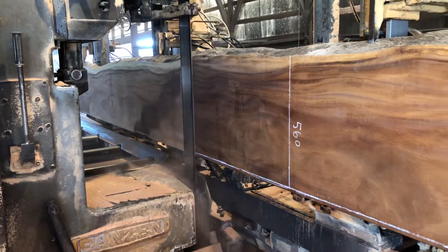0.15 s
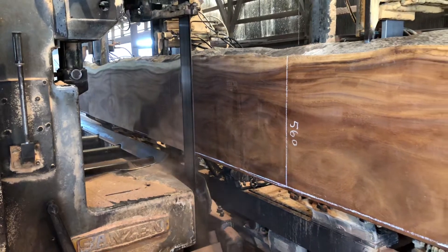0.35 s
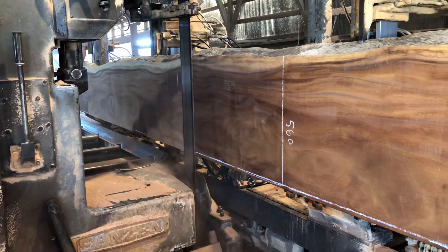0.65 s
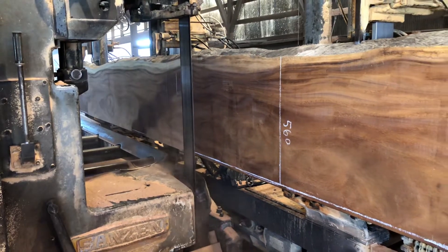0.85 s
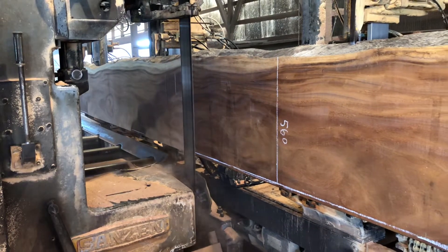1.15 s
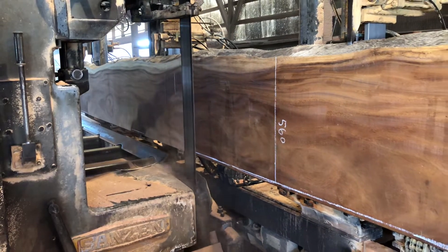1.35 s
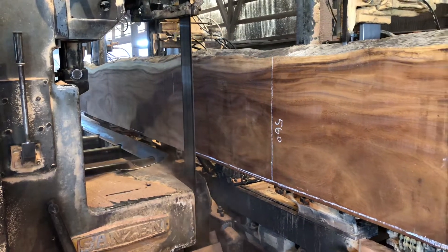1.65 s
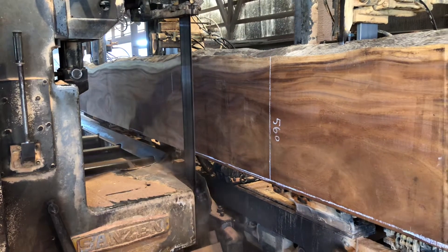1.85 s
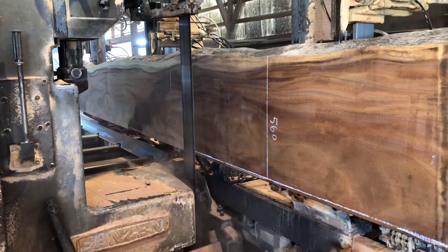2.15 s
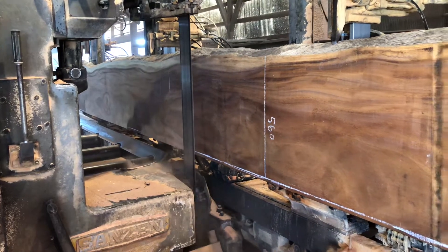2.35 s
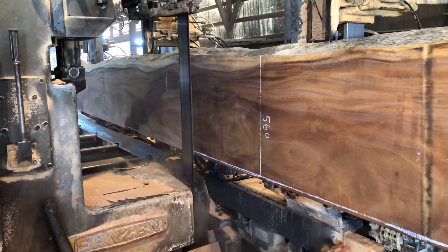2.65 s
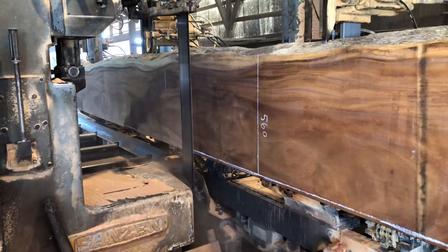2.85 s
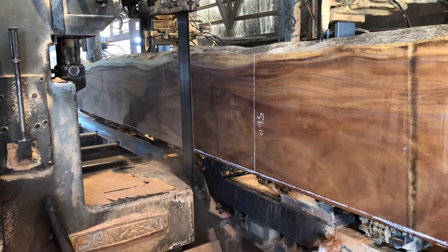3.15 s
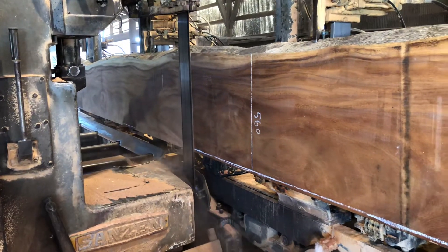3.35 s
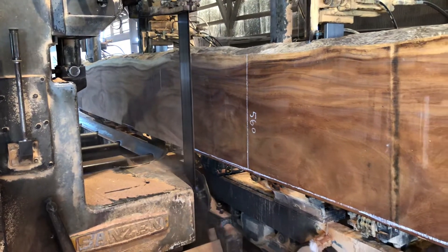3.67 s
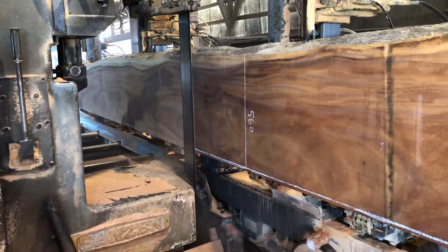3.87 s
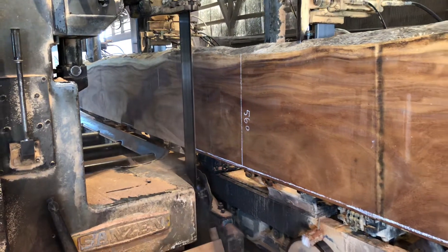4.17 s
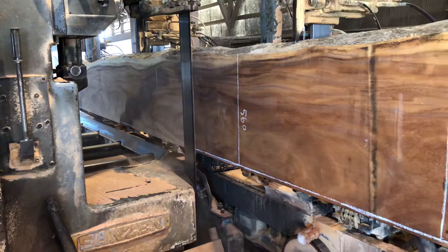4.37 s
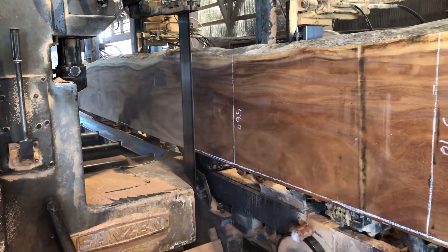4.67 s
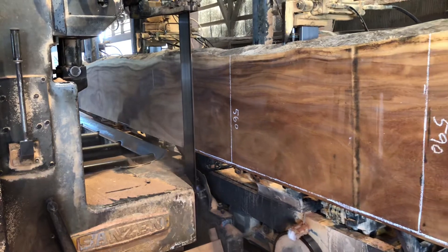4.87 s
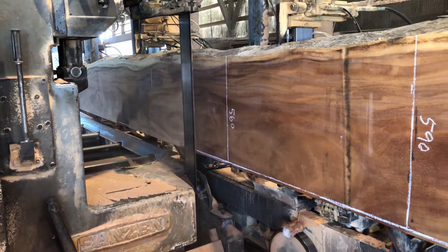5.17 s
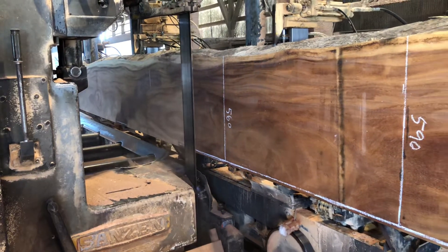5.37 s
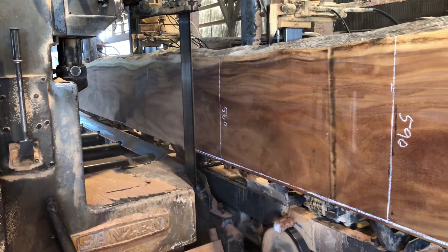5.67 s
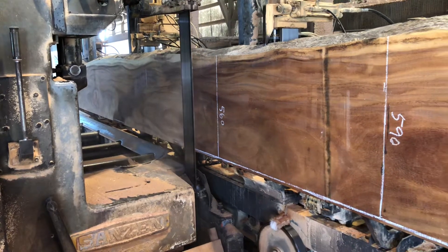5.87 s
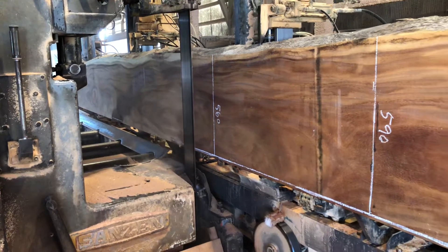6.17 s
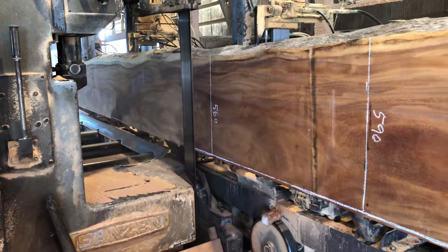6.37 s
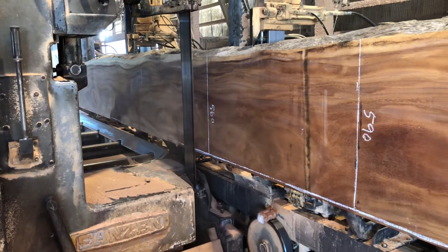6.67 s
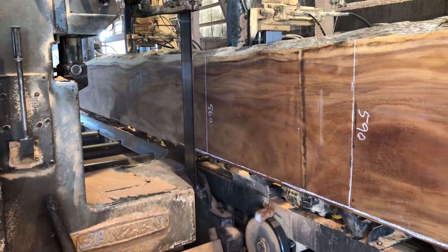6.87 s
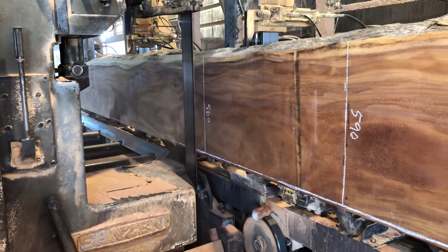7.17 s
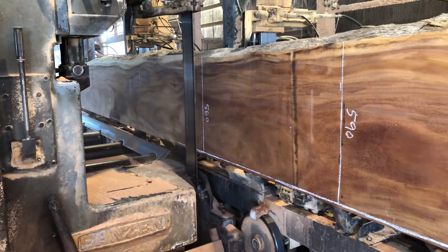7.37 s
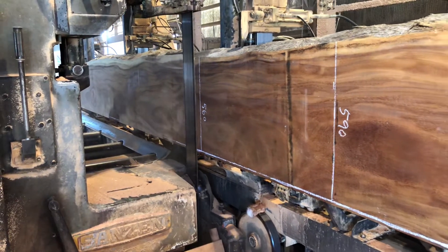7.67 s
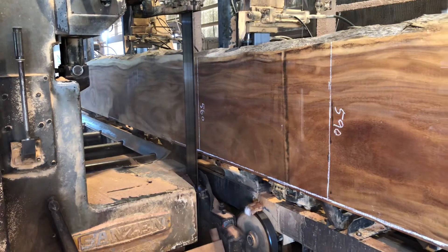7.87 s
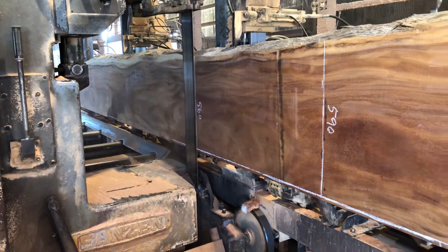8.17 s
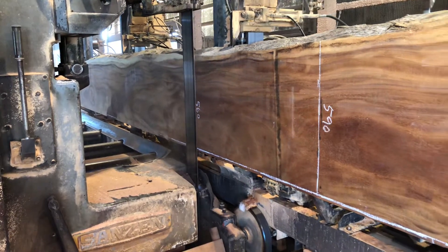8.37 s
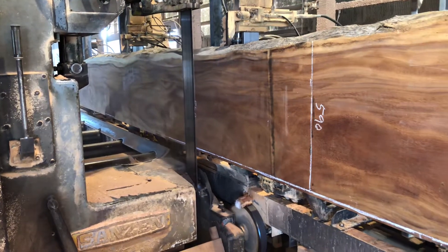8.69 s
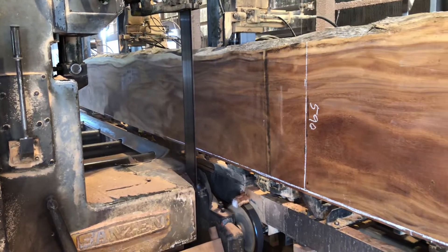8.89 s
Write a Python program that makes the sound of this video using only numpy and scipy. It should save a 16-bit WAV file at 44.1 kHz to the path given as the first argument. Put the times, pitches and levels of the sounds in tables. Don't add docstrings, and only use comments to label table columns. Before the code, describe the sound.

Close, practically mono microphone beside a running sawmill blade. Steady harsh hiss of torn wood fibres and high, slightly rough tooth whine flutter rapidly with the turning band wheel. Metallic resonances and a rough bearing roar fill the middle, with little deep bass. The brightness eases slightly past the middle while a soft carriage squeal dips and comes back; the cut never stops.

```python
import sys
import numpy as np
from scipy import signal
from scipy.fft import rfft, irfft, next_fast_len
from scipy.io import wavfile
from scipy.ndimage import uniform_filter1d, map_coordinates

SR = 44100
rng = np.random.default_rng(int(sys.argv[2]) if len(sys.argv) > 2 else 0)


def transcribe(signal):
    frames = np.atleast_2d(signal).T
    limited = np.clip(frames, -1, 1)
    pcm = np.round(limited * 32767).astype(np.int16)
    wavfile.write(sys.argv[1], SR, pcm)


def makeup_ratio(level_db):
    decades = np.asarray(level_db, float) / 20
    return 10 ** decades


N = 398223

TOOTH_HZ, WHEEL_HZ, ROLLER_HZ = 1264.3, 5.19, 11.65
TOP_HZ = 15740

# multiple_of_tooth_rate, level_db, growth_db_per_db of bite depth
TOOTH_LINES = [(1, -59, 0), (2, -59, 0), (3, -56, 0), (4, -53, 0), (5, -47.5, 0), (6, -48.5, 0),
               (7, -49, 0), (8, -45, .3), (9, -45.5, 1.6), (10, -44.3, 2.3), (11, -46.5, 1.6),
               (12, -42.8, 1.2)]
# cycles_per_turn, depth_db, phase_rad
WHEEL_RUNOUT = [(1, 0.9, 1.5), (2, 1.7, -1.3), (3, 0.6, -0.46), (4, 1.3, -1.4), (6, 1.3, -1.4)]
# pitch_hz, level_db
RING_MODES = [(234.1, -69), (251.1, -63), (296.6, -76), (311.2, -70), (481.7, -63), (646.3, -68),
              (688.7, -66), (818.1, -66), (853.6, -61), (863.4, -62), (933.8, -61), (946.8, -59),
              (957.7, -64), (1211.3, -60), (1222.2, -63), (1307.3, -62), (1351.1, -61), (1478.4, -51),
              (1652.4, -54), (1674.4, -48), (1724.8, -54), (1774.5, -52), (1910.3, -55), (1980.3, -56),
              (2166.1, -57), (2481.1, -52), (3063.0, -55), (3132.8, -54), (3598.7, -54), (4007.5, -52)]
# frequency_hz, gain_db
RUMBLE_COLOUR = [(20, -48), (40, -43), (92, -24), (195, -21.5), (350, -22), (460, -20), (490, -15.5),
                 (575, -16), (800, -14.5), (945, -16), (1160, -12), (1370, -12.5), (1450, -23),
                 (1600, -120)]
# frequency_hz, gain_db
MACHINE_COLOUR = [(1100, -120), (1350, -7.5), (1450, -6.5), (1680, -3.5), (2080, -4.5), (2500, -6),
                  (2800, -3.5), (3100, -5), (3200, -8.5), (3450, -6.5), (3550, -6), (4090, -4), (4500, -5),
                  (5500, -9.5)]
# frequency_hz, gain_db
FIBRE_COLOUR = [(1500, -49), (4000, -10), (5200, -2.5), (5800, -5), (6500, -3.5), (7050, -4), (8410, -3.5),
                (9300, -2), (9800, -2.5), (11000, -2.5), (12000, -4.5), (13250, -5), (14400, -3),
                (15750, -4)]
# centre_hz, width_hz, gain_db
SPAN_MODES = [(6400, 200, 0), (6700, 130, 1), (7290, 150, 0), (7980, 220, 3), (8280, 120, -1),
              (8900, 200, 0), (9300, 220, 5.5), (10650, 350, -1), (14850, 350, 2.5)]
# centre_hz, width_hz, gain_db
BODY_MODES = [(484, 97, 6), (619, 54, 3), (855, 36, 7), (942, 46, 6), (990, 14, 6), (1033, 70, 5),
              (1216, 27, 2), (1480, 55, 6), (1645, 50, 0), (1668, 262, 6), (2164, 34, 4), (2271, 79, 7),
              (2476, 52, 7), (2524, 25, 7), (2755, 70, 4), (2761, 387, 7), (2820, 63, 3), (3046, 51, 6),
              (3133, 23, 2), (3332, 150, 5), (3510, 30, 5), (3596, 89, 7), (3795, 134, 4), (4010, 440, 5),
              (4166, 69, 5), (4300, 90, 2), (4554, 58, 3), (5054, 141, 6), (5200, 61, 5), (5437, 111, 4)]
# start_s, level_db
CARRIAGE_LEVEL = [
    (0, -57),
    (5.5, -70),
    (7, -56),
    (9.03, -56),
]
# start_s, hiss_level_db
BITE_DEPTH = [(0, -30), (.35, -30), (1, -31.5), (2.3, -31.5), (3, -30.2), (3.6, -31), (4.3, -31.5),
              (4.8, -31), (5.4, -31.5), (6, -33.5), (7.3, -32.5), (8.4, -32), (9.03, -32)]
# middle_s, then centre_hz of each band concerned
CHANNEL_SPLITS = [(.104, 4650), (.173, 11700), (.545, 8300), (.777, 5150, 6300), (1.265, 12400),
                  (1.311, 7600, 12400), (1.427, 5450), (1.497, 9000, 10900), (1.683, 11700), (1.938, 5150),
                  (2.426, 4650), (3.401, 7600, 12700), (3.726, 4650), (3.889, 7600, 9000),
                  (4.376, 5700, 13750), (4.864, 9000), (5.003, 15150), (5.351, 5700, 13100),
                  (5.537, 5700, 11700), (5.978, 6300, 13100), (6.187, 7600, 13100, 15000),
                  (6.605, 5700, 12050, 14450), (7.557, 6300), (7.581, 13100), (7.673, 14450),
                  (8.184, 4650, 10350), (8.602, 10350, 15150)]


def unit(x):
    return x / np.sqrt(np.mean(x ** 2) + 1e-20)


def along(points, hz):
    f, v = np.transpose(points)
    return np.interp(np.log(hz + 1), np.log(f + 1), v)


def level_curve(rows):
    s, db = np.transpose(rows)
    return np.interp(np.arange(N) / SR, s, db)


def wobble(rate):
    steps = np.arange(0, N + 64, 64)
    knots = rng.standard_normal(int(N * rate / SR) + 4)
    return np.interp(np.arange(N), steps, map_coordinates(knots, [steps * rate / SR]))


def filtered(x, response):
    m = next_fast_len(N + SR // 2)
    return irfft(rfft(x, m) * response(np.fft.rfftfreq(m, 1 / SR)), m)[..., :N]


def rush(response, patchy_db):
    z = signal.stft(rng.standard_normal(N), nperseg=512)[2]
    field = uniform_filter1d(rng.standard_normal(z.shape), size=8, axis=0)
    field = uniform_filter1d(field, size=8, axis=1)
    patchy = signal.istft(z * makeup_ratio(patchy_db * unit(field)), nperseg=512)[1][:N]
    return unit(filtered(patchy, response))


def peak(hz, centre_hz, width_hz):
    return 2 / (np.pi * width_hz) / (1 + (2 * (hz - centre_hz) / width_hz) ** 2)


def ringing(centre_hz, width_hz):
    hz = np.fft.rfftfreq(next_fast_len(N), 1 / SR)
    chance = rng.standard_normal(len(hz)) + 1j * rng.standard_normal(len(hz))
    return unit(irfft(chance * peak(hz, centre_hz, width_hz) ** .52)[:N])


def resonant(hz, modes):
    return np.sqrt(1 + sum(makeup_ratio(db) ** 2 * w * peak(hz, c, w) for c, w, db in modes))


def shed(hz, depth_db, spacing_hz):
    knots = rng.uniform(-1.1, 1, int(SR / 20))
    return makeup_ratio(depth_db * map_coordinates(knots, [hz / max(spacing_hz, 15)]))


def roller(hz, share):
    turn = np.round(hz / ROLLER_HZ).astype(int)
    uneven = rng.uniform(0, 1, turn[-1] + 1)[turn] ** 2 * 3
    lasting = peak(hz, turn * ROLLER_HZ, .25 + .00008 * hz)
    fleeting = peak(hz, turn * ROLLER_HZ, 3.5)
    return np.sqrt(1 + share * uneven * ROLLER_HZ * (lasting + fleeting) / 2)


def carriage_wheel():
    return makeup_ratio(level_curve(CARRIAGE_LEVEL)) * ringing(1042, 30)


def roar():
    def frame(hz):
        return resonant(hz, BODY_MODES) * roller(hz, share=.4) * shed(hz, depth_db=1.6, spacing_hz=20)

    low = rush(lambda hz: makeup_ratio(along(RUMBLE_COLOUR, hz)) * frame(hz), patchy_db=.5)
    mid = rush(lambda hz: makeup_ratio(along(MACHINE_COLOUR, hz)) * frame(hz), patchy_db=-0.26)
    return makeup_ratio(-14.5) * low + makeup_ratio(1.0) * mid


def narrow_modes():
    t = np.arange(N) / SR
    rings = np.zeros(N)
    for hz, db in RING_MODES:
        rough = np.clip((hz - 300) / 900, .01, .75)
        drift_rad = .001 * hz * wobble(2.5)
        tone = np.sqrt(2) * np.sin(2 * np.pi * hz * t + drift_rad + rng.uniform(0, 2 * np.pi))
        level = makeup_ratio(db + 2.5 * rough * wobble(.9))
        shaken = ringing(hz, 2 + .0015 * hz)
        rings += level * (np.sqrt(1 - rough) * tone + np.sqrt(rough) * shaken)
    return rings


def machine():
    return makeup_ratio(-31) * (roar() + makeup_ratio(31.0) * narrow_modes()) + carriage_wheel()


def bite():
    angle = 2 * np.pi * WHEEL_HZ * np.arange(N) / SR
    return sum(db * np.cos(k * angle + rad) for k, db, rad in WHEEL_RUNOUT)


def tooth_whine(depth_db):
    whine = np.zeros(N)
    for k, db, grows in TOOTH_LINES:
        level = makeup_ratio(db + grows * (depth_db - depth_db.mean()) + 1.2 * wobble(9))
        whine += level * ringing(k * TOOTH_HZ, 4.3 * k)
    return whine


def torn_fibres(depth_db, load_db):
    def colour(hz):
        grain = roller(hz, share=.09) * shed(hz, depth_db=1.1, spacing_hz=60)
        return makeup_ratio(along(FIBRE_COLOUR, hz)) * resonant(hz, SPAN_MODES) * grain

    hiss = rush(colour, patchy_db=0.77)
    bright = filtered(hiss, lambda hz: np.clip((hz - 8000) / 4000, 0, 1))
    steady = makeup_ratio(-25.5) * (hiss - bright) * makeup_ratio(0.092 * load_db)
    kerf = makeup_ratio(depth_db + 4.0 + 0.33 * load_db + 0.58 * wobble(60)) * bright
    return steady + kerf


def blade():
    depth_db = level_curve(BITE_DEPTH)
    load_db = bite() * (1 + 0.26 * wobble(1.53)) + 0.3 * wobble(11) + 0.18 * wobble(5.5)
    return torn_fibres(depth_db, load_db) + makeup_ratio(1.1 * load_db) * tooth_whine(depth_db)


def scene():
    mono = machine() + blade()
    return np.array([mono, mono])


def top_cut(x):
    return signal.sosfilt(signal.butter(12, 17090, fs=SR, output="sos"), x)


def record(dry):
    half = 1024
    side = np.zeros(N + 2 * half)
    hz = np.fft.rfftfreq(2 * half, 1 / SR)
    window = np.sin(np.pi * np.arange(2 * half) / (2 * half))
    for s, *centres in CHANNEL_SPLITS:
        for centre_hz in centres:
            width_hz = min(0.19 * centre_hz, 1400)
            inside = abs(hz - centre_hz) < width_hz / 2
            band = irfft(rfft(rng.standard_normal(2 * half)) * inside)
            side[round(s * SR) - half:][:2 * half] += makeup_ratio(-43.5) * unit(band * window)
    mix = filtered(dry + side[:N] * [[1], [-1]], lambda f: f < TOP_HZ)
    return top_cut(mix)


dry = scene()
out = record(dry)
transcribe(out)
```